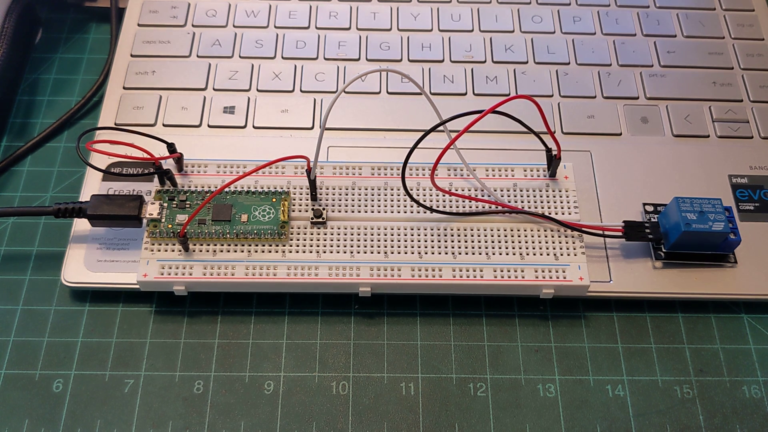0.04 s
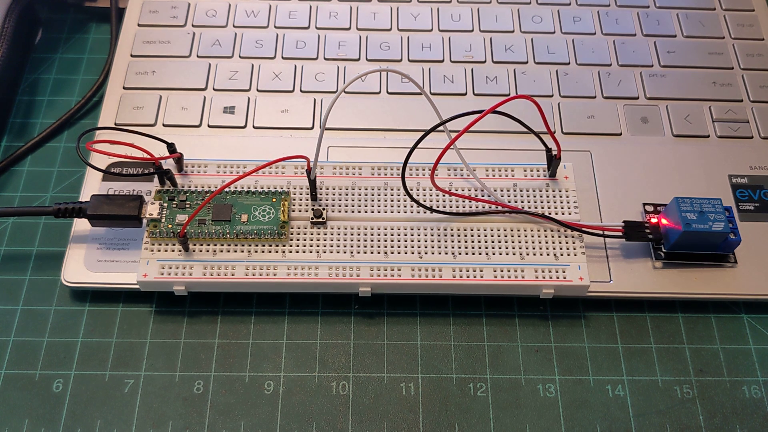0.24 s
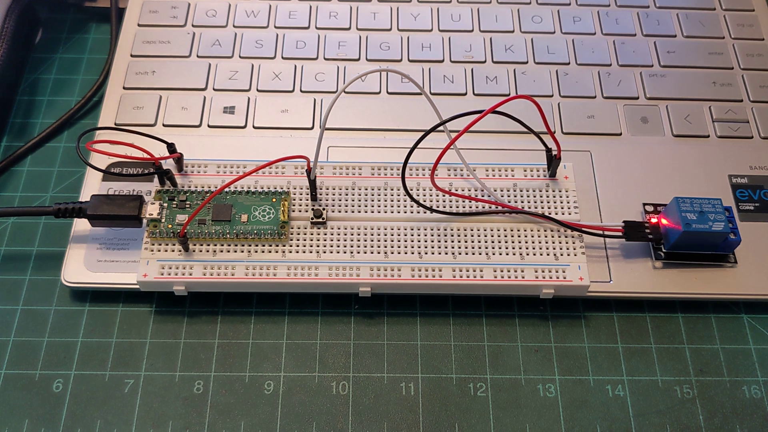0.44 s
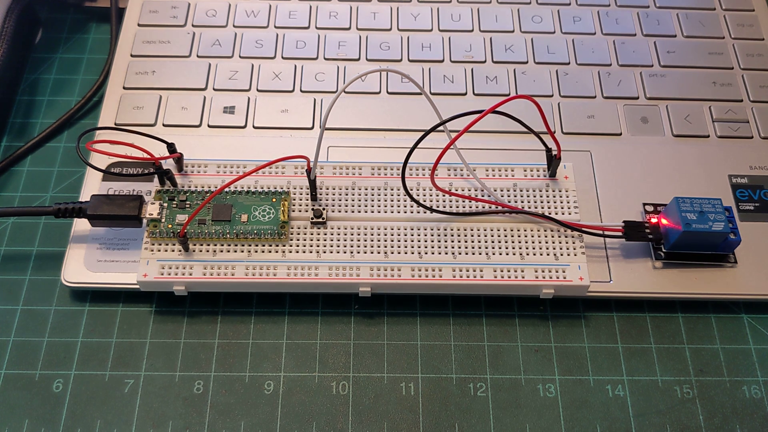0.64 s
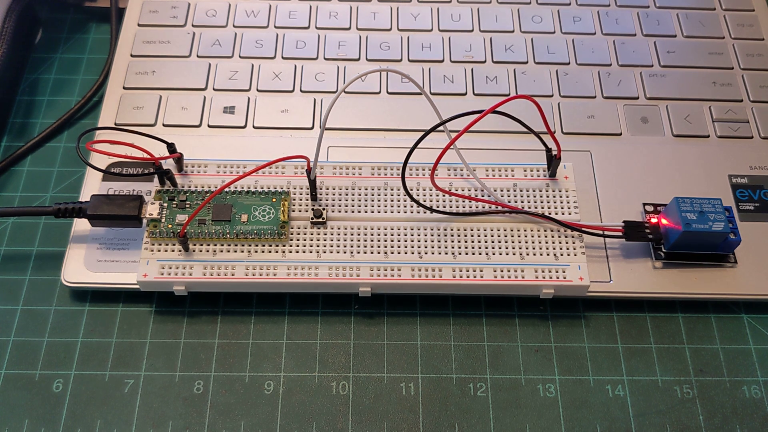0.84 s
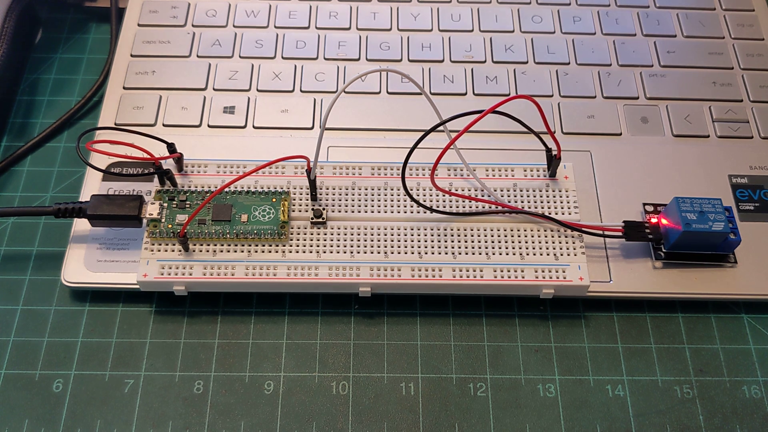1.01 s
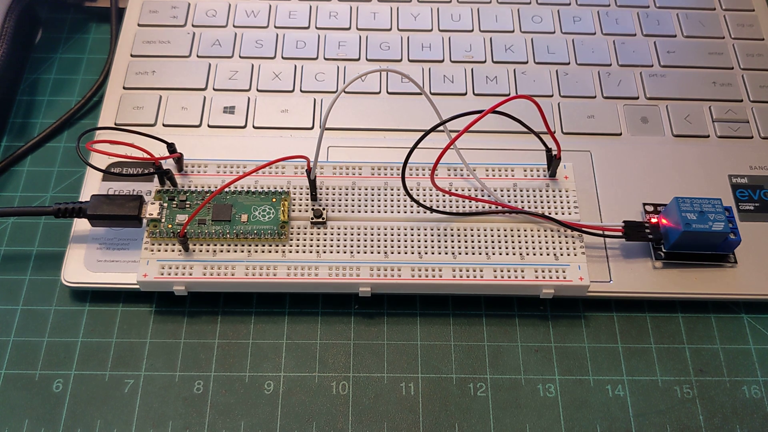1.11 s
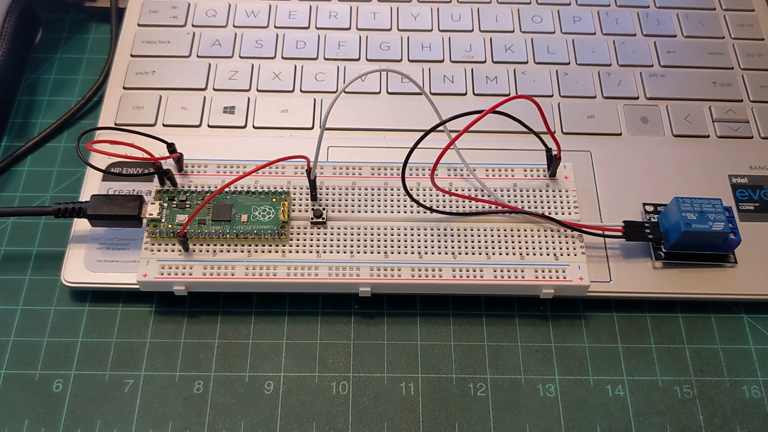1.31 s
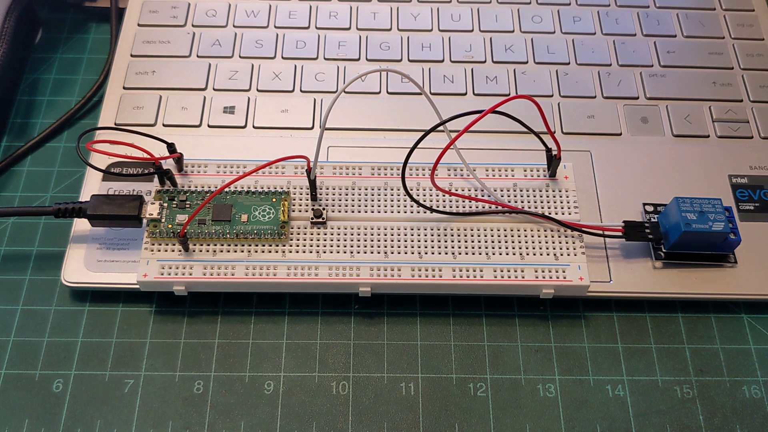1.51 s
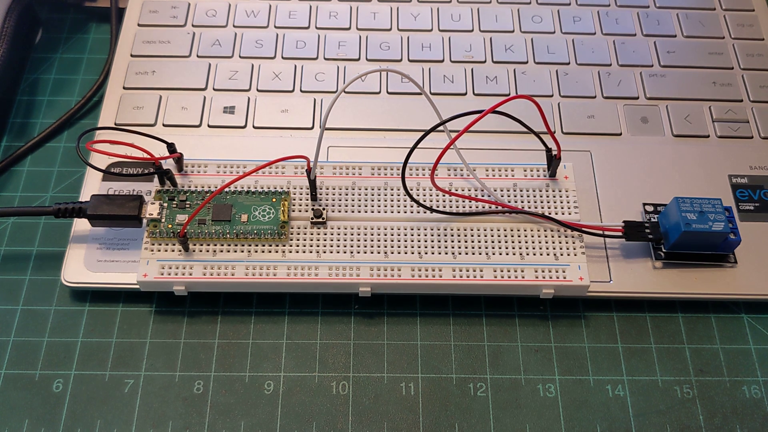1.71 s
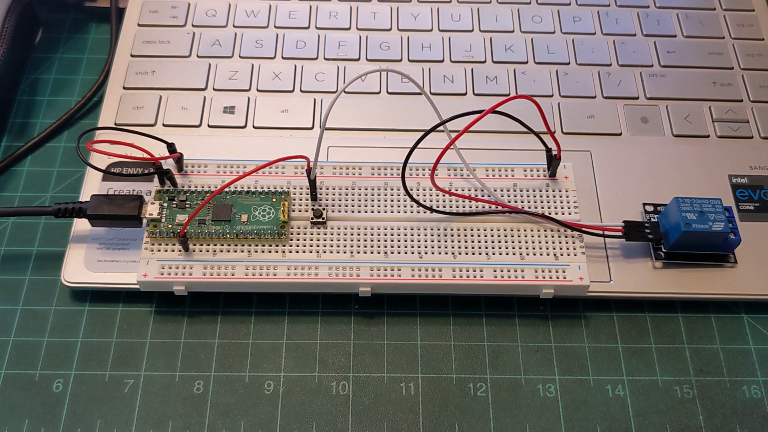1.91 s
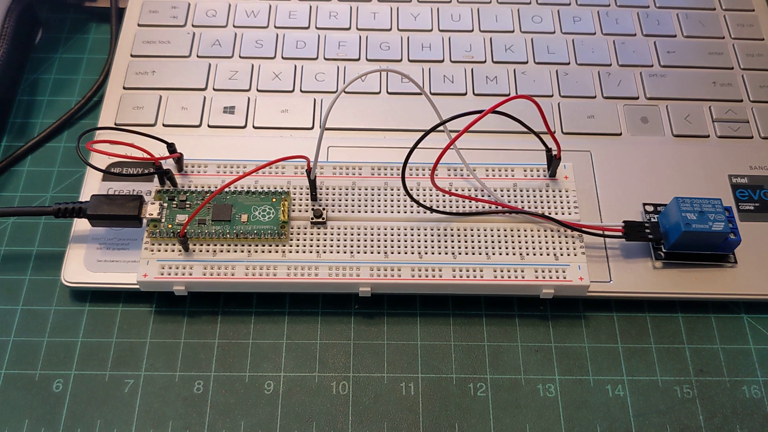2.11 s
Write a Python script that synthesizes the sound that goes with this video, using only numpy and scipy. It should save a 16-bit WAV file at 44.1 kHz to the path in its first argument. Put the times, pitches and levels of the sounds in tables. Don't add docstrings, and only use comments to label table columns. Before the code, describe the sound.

A small relay on a desk snaps on at about 0.2 seconds with a sharp, bright, plasticky click made of very rapid contact bounces. At about 1.2 seconds it drops out with a second, slightly lower and looser click, beside a very faint cloth rustle lasting until 1.5. Both are close and dry, with brief small-room reflections. Low ventilation rumble, soft hiss and faint hum continue throughout.

```python
import sys
import numpy as np
from scipy import signal
from scipy.fft import rfft, irfft
from scipy.io import wavfile
from scipy.ndimage import map_coordinates

SR = 44100
rng = np.random.default_rng(int(sys.argv[2]) if len(sys.argv) > 2 else 0)


def store_pcm(level_fs):
    pcm = np.round(np.clip(level_fs, -1, 1) * 32767).astype(np.int16)
    wavfile.write(sys.argv[1], SR, np.atleast_2d(pcm).T)


def to_linear_factor(level_db):
    exponent = np.asarray(level_db, float) / 20
    return 10 ** exponent


N = 94815
T = np.arange(N) / SR
HZ = np.fft.rfftfreq(N, 1 / SR)
AIR_TOP_HZ = 15850


def at_hz(points):
    p = np.array(points, float)
    return np.interp(np.log(HZ + 1), np.log(p[:, 0]), p[:, 1])


def rms_one(x):
    return x / np.sqrt(np.mean(x ** 2) + 1e-20)


def drift(rate):
    knots = rng.standard_normal(400)
    return map_coordinates(knots, [T * rate], order=3)


def air(spectrum, low_hz, high_hz):
    # f/Hz, width/Hz, lift/dB
    resonances = [(109, 47, 9), (144.7, 14.6, -15), (159.7, 27, 9.5), (240, 47, 8), (288.7, 15, -7.5),
                  (312, 20, 7), (403, 37, 8.5), (663, 120, 6.5), (1313, 210, 6.5), (2293, 200, 8.5),
                  (2890, 220, 3), (3350, 64, 3.5), (7100, 400, 6), (9070, 220, 10.5), (12000, 200, 10)]
    # f/Hz, shared part (0 to 1)
    shared_part = [(60, 1), (250, 1), (500, .65), (1400, 0.46), (3000, .5), (6000, .25), (15000, .05)]
    # f/Hz, left minus right/dB
    balance = [(60, -1), (130, 1.5), (290, 1.5), (640, -0.5), (1410, 6), (3100, 3), (6820, 1), (15000, 3.5)]
    left_early_s, patchy_db = 0.00037, -0.06

    lift = sum(db / (1 + (2 * (HZ - hz) / width) ** 2) for hz, width, db in resonances)
    colour = to_linear_factor(at_hz(spectrum) + lift) * (HZ > low_hz) * (HZ <= high_hz)

    shared, left, right = rfft(rng.standard_normal((3, N)))
    alike = np.clip(at_hz(shared_part), 0, 1)
    lean = to_linear_factor(at_hz(balance) / 2)
    shared = np.sqrt(alike) * shared
    own = np.sqrt(1 - alike)
    earlier = np.exp(2j * np.pi * HZ * left_early_s)
    left = (shared * earlier + own * left) * lean
    right = (shared + own * right) / lean
    noise = irfft(colour * np.array([left, right]), N)
    return rms_one(noise) * to_linear_factor(patchy_db * drift(15.0))


def mains_hum():
    hum_hz, hum_db, wobble_db, left_lead_rad = 58.8, -60.5, 1.0, .35
    level = np.sqrt(2) * to_linear_factor(hum_db + wobble_db * drift(8.0))
    lead = np.array([[left_lead_rad], [0]])
    return level * np.sin(2 * np.pi * hum_hz * T + .25 * drift(5.0) + lead)


def background():
    # f/Hz, level/dB
    rumble_colour = [(20, -45.5), (45, -28.5), (75, -17.5), (110, -9), (240, -9.5), (330, -12.5),
                     (500, -17.5), (1000, -22)]
    # f/Hz, level/dB
    hiss_colour = [(1000, -5.5), (1400, -5), (2400, -12), (3300, -11.5), (4200, -18), (9000, -24.5),
                   (10500, -29), (16000, -29)]
    rumble_db, hiss_db, split_hz = -51.5, -60.5, 1000
    rumble = to_linear_factor(rumble_db) * air(rumble_colour, 15, split_hz)
    hiss = to_linear_factor(hiss_db) * air(hiss_colour, split_hz, AIR_TOP_HZ)
    return mains_hum() + rumble + hiss


def rustle():
    # t/s, level/dB
    swell = [
        (1.12, -100),
        (1.181, -66.5),
        (1.25, -66),
        (1.35, -63),
        (1.42, -72),
        (1.5, -100),
    ]
    low_hz = 7000
    s, db = np.transpose(swell)
    level = to_linear_factor(np.interp(T, s, db, left=-140, right=-140))
    slope = (HZ < AIR_TOP_HZ) / np.sqrt(1 + (low_hz / (HZ + 1)) ** 4)
    return level * irfft(slope * rfft(rng.standard_normal((2, N))), N)


def room(x):
    # delay t/s, level/dB
    echoes = [
        (.0050, -25),
        (.0098, -22),
        (.0185, -26),
    ]
    # start t/s, level/dB, time to fall 60 dB t/s
    tails = [
        (.003, -26.5, 0.097),
        (0.014, -45, 0.33),
    ]
    # f/Hz, level/dB
    tail_colour = [(500, -14.5), (2000, -12.5), (4700, -15), (6000, -6), (8500, -4.5), (10500, -15),
                   (13000, -11), (15800, -9)]
    smear_s, lean_db = .0004, 2

    reply = np.zeros((2, N))
    for delay, db in echoes:
        bump = np.exp(-((T - delay) / smear_s) ** 2)
        reply += to_linear_factor(db - 4) * bump * rng.standard_normal((2, N))
    for begin, db, t60 in tails:
        rise = np.clip((T - begin) / .002, 0, 1)
        reply += rise * to_linear_factor(db - 60 * T / t60) * rng.standard_normal((2, N))
    colour = to_linear_factor(at_hz(tail_colour)) * (HZ < AIR_TOP_HZ)
    answer = irfft(rfft(x) * rfft(reply) * colour, N)
    return answer * to_linear_factor(lean_db * np.array([[1], [-1]]))


def switch(touches, modes):
    left_late_s, touch_spread_db = .00017, 1.5
    swell_cycles, phase_kick_rad = .8, .7
    ring_left_db, ring_right_db = 2, 0
    crack_db, crack_t60_s, crack_low_hz = -30, .004, 5000
    body_db, body_low_hz = 7.5, 1500

    start, size = int(touches[0][0] * SR) - 100, 4096
    s, db = np.transpose(touches)[:, :, None, None]
    t = (start + np.arange(size)) / SR - np.array([[left_late_s], [0]])
    since = np.maximum(t - s, 0)

    ring = 0
    for hz, left_db, right_db, t60 in modes:
        chance = rng.standard_normal((len(s), 2, 1, 1))
        swell = 1 - np.exp(-since * hz / swell_cycles)
        fade = to_linear_factor(db + touch_spread_db * chance[:, 0] - 60 * since / t60)
        phase = 2 * np.pi * (hz * t + rng.random()) + phase_kick_rad * chance[:, 1]
        ears = to_linear_factor(np.array([[left_db + ring_left_db], [right_db + ring_right_db]]))
        ring = ring + np.sum(swell * fade * np.sin(phase), axis=0) * ears

    burst = np.sum((since > 0) * to_linear_factor(db + crack_db - 60 * since / crack_t60_s), axis=0)
    burst = burst * rng.standard_normal((2, size))
    high = signal.butter(4, crack_low_hz, "high", fs=SR, output="sos")
    body = signal.butter(2, body_low_hz, "high", fs=SR, output="sos")
    crack = signal.sosfilt(high, burst) + to_linear_factor(body_db) * signal.sosfilt(body, burst)

    out = np.zeros((2, 2, N))
    out[..., start:start + size] = ring, crack
    return out


def relay():
    # t/s, level/dB
    pull_in = [
        (.2190, -26),
        (.2199, -11),
        (.2204, 0),
        (.2209, -1),
        (.2216, -6),
        (.2229, -11),
        (.2243, -16),
    ]
    # t/s, level/dB
    drop_out = [
        (1.2192, -18),
        (1.2205, -1),
        (1.2214, -4),
        (1.2222, -8),
        (1.2230, 0),
        (1.2239, -3),
        (1.2254, -9),
    ]
    # f/Hz, left level/dB, right level/dB, time to fall 60 dB t/s
    core_modes = [(1420, -38, -45, .01), (2250, -36, -43, .007), (3250, -34, -31, .008),
                  (4900, -42, -38, .005), (5750, -30, -26, .008), (6480, -30, -24, .008),
                  (7780, -21, -31, .008), (8150, -18, -22, .008), (9400, -19, -28, .005),
                  (11000, -24, -42, .005), (12300, -25, -23, .005), (12900, -18, -31, .005),
                  (13500, -21, -27, .005), (14700, -28, -18, .005)]
    # same columns, f/Hz, level/dB, level/dB, t/s
    rest_modes = [(700, -37, -33, .012), (1400, -27, -32, .011), (2400, -34, -39, .006),
                  (3300, -35, -35, .006), (4400, -32, -42, .009), (5880, -27, -27, .008),
                  (6450, -27, -24, .007), (7060, -23, -32, .008), (7410, -29, -21, .008),
                  (8200, -25, -29, .008), (9080, -25, -38, .006), (10000, -21, -37, .006),
                  (12800, -26, -37, .006), (14100, -33, -33, .006)]
    click_low_hz, click_top_hz = 500, 15500
    ring_to_room_db, crack_to_room_db, drop_out_room_db = -11, 9, -3

    ring, crack = switch(pull_in, core_modes) + switch(drop_out, rest_modes)
    low_cut = signal.butter(3, click_low_hz, "high", fs=SR, output="sos")
    top_cut = signal.cheby1(8, .5, click_top_hz, fs=SR, output="sos")
    clicks = signal.sosfilt(np.vstack([low_cut, top_cut]), ring + crack + 1e-18)

    sent = to_linear_factor(ring_to_room_db) * ring + to_linear_factor(crack_to_room_db) * crack
    sent = sent * np.where(np.arange(N) < N / 2, 1, to_linear_factor(drop_out_room_db))
    return clicks, sent


def scene():
    clicks, sent = relay()
    return clicks + room(sent) + background() + rustle()


def band_limit(x):
    return signal.sosfilt(signal.butter(12, 16830, fs=SR, output="sos"), x)


def record(dry):
    return band_limit(dry)


dry = scene()
out = record(dry)
store_pcm(out)
```